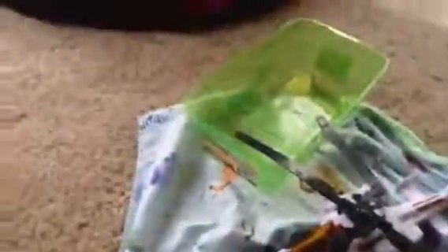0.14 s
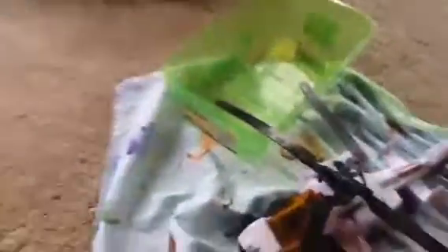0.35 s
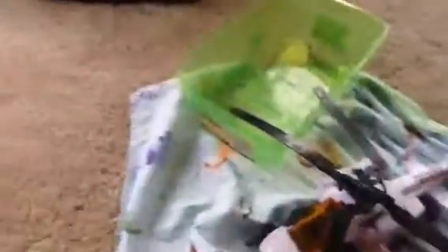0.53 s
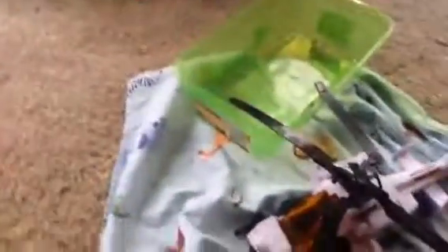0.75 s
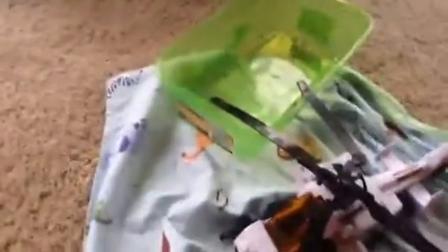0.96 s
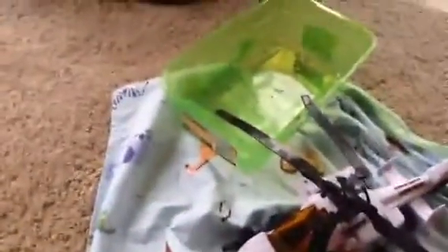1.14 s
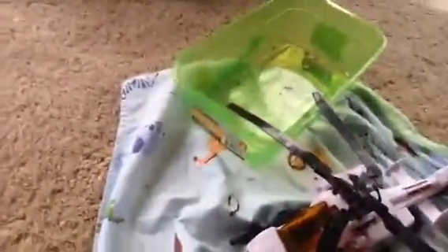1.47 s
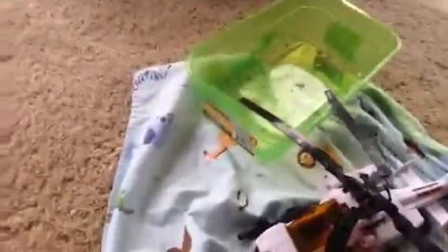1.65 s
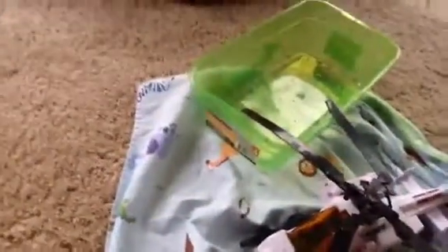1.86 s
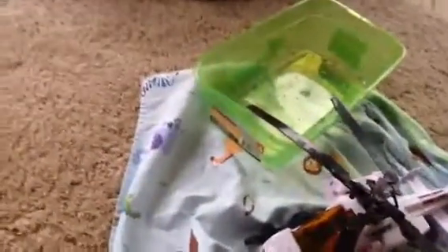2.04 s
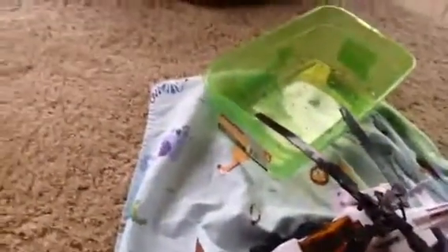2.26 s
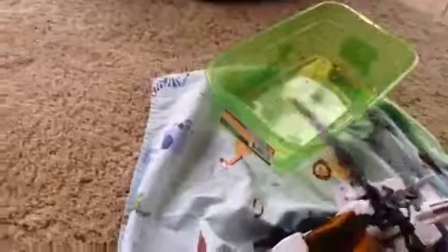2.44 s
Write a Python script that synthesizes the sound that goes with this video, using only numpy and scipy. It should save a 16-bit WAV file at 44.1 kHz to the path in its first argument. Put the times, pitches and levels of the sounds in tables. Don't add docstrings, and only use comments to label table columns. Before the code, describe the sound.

Close-up clatter of dried beans scooped and stirred by toy trucks in a plastic tub

```python
import sys
import numpy as np
from scipy import signal
from scipy.io import wavfile
from scipy.ndimage import uniform_filter1d

SR = 44100
rng = np.random.default_rng(int(sys.argv[2]) if len(sys.argv) > 2 else 0)


def field_ratio(decibels):
    return 10 ** (np.asarray(decibels, dtype=float) / 20)


def dump_mix(stems):
    frames = np.atleast_2d(stems).T
    limited = np.clip(frames, -1, 1)
    pcm = np.round(limited * 32767).astype(np.int16)
    wavfile.write(sys.argv[1], SR, pcm)


N = 114660

# start_s, peak_db, pitch_hz, rattle_ms
SCOOP_TICKS = [(0.3352, -29, 5000, 1), (0.4953, -33, 6500, 1.0), (0.6963, -28.5, 8400, 0.2),
               (0.8217, -22, 7800, 0.75), (0.8875, -19.5, 5100, 1), (0.901, -17.5, 8350, 2.7),
               (1.0302, -20, 5700, 0.66), (1.0665, -18, 4400, 6.7), (1.0855, -19, 4030, 6.4),
               (1.1106, -15, 4970, 0.37), (1.1563, -18.5, 7700, 0.76), (1.3781, -15.5, 5900, 0.14),
               (1.394, -21, 4140, 0.54), (1.4053, -24, 6100, 0.45), (1.4524, -19.5, 8800, 1.8),
               (1.4609, -23, 8500, 0.6), (1.5487, -19, 5040, 0.36), (1.6083, -21.5, 7100, 1.9),
               (1.6127, -17, 7350, 1.9), (1.6494, -8, 9300, 0.84), (1.6577, -14, 4940, 2.7),
               (1.7711, -9.5, 6190, 1.6)]
# start_s, peak_db, pitch_hz
POUR_TICKS = [(1.889, -19, 7800), (1.8946, -18.5, 8450), (1.9492, -19.5, 7200), (1.9614, -8, 4200),
              (2.0164, -23, 4310.0), (2.0688, -16, 6250), (2.0738, -16, 4400), (2.0786, -8, 4540),
              (2.0915, -10.5, 9200), (2.1037, -17, 8140), (2.1266, -17, 7800), (2.161, -15.5, 4870),
              (2.1874, -19.5, 5830), (2.2194, -8, 9050), (2.223, -15, 8900), (2.238, -10, 8550),
              (2.2606, -19, 6960), (2.2919, -13.5, 9900), (2.2975, -17, 6600), (2.4058, -16.5, 5500),
              (2.4413, -4, 8870), (2.4761, -19.5, 5200), (2.5435, -25.5, 9770.0)]
# start_s, peak_db, pitch_hz
BEAN_SKIPS = [(0.5433, -31, 7600), (.5656, -32, 5950), (.569, -25.5, 8100), (.5812, -27, 6860),
              (0.7071, -33, 3120), (0.7842, -31, 3280), (0.85, -26, 3440), (.988, -22.5, 6000),
              (1.242, -27, 5310), (1.259, -27, 8900), (1.2968, -22.5, 7900), (1.3279, -23, 4900),
              (1.3395, -24, 6120), (1.4316, -23, 6940), (1.539, -30.5, 3800), (1.6374, -26, 5260),
              (1.6936, -29, 4700), (1.716, -24.5, 4150), (2.0673, -14.5, 9100), (2.095, -12, 3500),
              (2.1002, -15, 4730), (2.117, -24, 7000), (2.1218, -21, 4000), (2.178, -16, 5000),
              (2.189, -17, 8860), (2.2178, -14.5, 6400), (2.2262, -22, 9170), (2.244, -17, 9310),
              (2.264, -11.5, 8100), (2.274, -21, 9380), (2.283, -17, 4000), (2.3267, -17, 6360),
              (2.3416, -26, 6880), (2.3638, -14.5, 6960), (2.4296, -24, 3800), (2.491, -26, 6400),
              (2.5235, -22.5, 6970), (2.5972, -24, 4960)]
# start_s, length_s, level_db
HANDFULS = [(0.486, 0.046, -43.5), (0.543, 0.066, -42.5), (0.7, 0.04, -53), (0.764, 0.18, -39),
            (0.904, 0.31, -41), (1.03, 0.16, -37), (1.149, 0.33, -41.5), (1.422, 0.2, -43),
            (1.505, 0.087, -39.5), (1.619, .13, -36), (1.877, 0.067, -41), (1.939, 0.075, -29.5),
            (2.007, 0.051, -38), (2.056, 0.1, -28), (2.167, 0.046, -30), (2.192, 0.14, -27),
            (2.326, 0.13, -26.5), (2.459, 0.08, -34), (2.517, 0.14, -45)]
# freq_hz, level_db
STIR_TONE = [(900, -17.5), (2500, -5.5), (5000, -2), (9500, -1.5), (13500, -4.5), (16500, -13)]
# time_s, level_db
SHOVE_LEVEL = [(.6, -53), (.7, -52.5), (.73, -48.5), (.88, -38), (1.1, -34), (1.2, -46.5), (1.3, -44),
               (1.72, -46), (1.87, -48.5), (1.95, -35.5), (2.05, -39), (2.09, -37.5), (2.37, -33),
               (2.45, -38), (2.6, -51)]
# freq_hz, level_db
SHOVE_TONE = [(60, -19.5), (350, 1.5), (800, 0), (1450, 1.5), (3500, 3), (7000, -2.5), (16000, -50)]
# start_s, peak_db, pitch_hz
TRUCK_KNOCKS = [(0.8221, -25, 1950), (0.9101, -14.5, 1610), (1.284, -28, 1550), (1.3771, -24, 2140),
                (1.3862, -19.5, 1520), (1.7716, -27, 1450), (1.8198, -37, 1560), (1.841, -32, 1410),
                (1.923, -20.5, 1260), (1.9624, -22, 2000), (2.0742, -20.5, 1170), (2.082, -16.5, 1970),
                (2.1335, -28, 1930.0), (2.1909, -17.5, 1465), (2.2359, -16.5, 1740), (2.3119, -23, 1480),
                (2.352, -15, 1620)]
# start_s, peak_db, pitch_hz
PART_CHATTER = [(0.708, -41, 1970), (0.726, -36, 1050), (0.784, -31.5, 1080), (0.85, -29, 2230),
                (0.901, -17, 1620), (1.217, -36, 1330), (1.241, -33.5, 2030), (1.291, -26, 1550),
                (1.307, -34, 1580), (1.581, -32.5, 1970), (1.658, -30.5, 1840), (2.107, -25, 1370),
                (2.121, -25.5, 1600), (2.126, -25, 1500), (2.157, -41, 1470), (2.218, -18.5, 2160),
                (2.263, -25, 1610), (2.326, -31, 1570), (2.542, -29.5, 2140)]
# time_s, level_db
DRAG_LEVEL = [
    (0, -42),
    (.07, -40),
    (.135, -33),
    (.22, -36),
    (.3, -41),
    (.335, -37.5),
    (.4, -48.5),
    (.55, -55),
]
# freq_hz, level_db
DRAG_TONE = [(60, -51), (400, -12.5), (700, -14.5), (1030, -4), (2300, 1), (5000, -0.5), (13000, -11),
             (16000, -24)]
# pitch_hz, width_hz, level_db, loudest_s
AXLE_RINGS = [(655, 3.4, -3, 0.26), (900, 5.9, 3, 0.03), (1041, 34, 7, 0.026), (1080, 54, -7, 0.27),
              (1437, 8, 2.5, 0.26), (2280, 130, 0, .14), (5000, 340, 2, 0.28)]
# after_touch_s, level_db
BLOWS = [
    (.001, 0),
    (.006, -5),
    (0.0104, -2),
    (.021, 1),
    (.037, -10),
]
# pitch_hz, level_db, t60_s
TUB_RINGS = [(193, -13, 0.1), (300, -8, 0.44), (384, 10.5, 0.05), (452, 10, 0.056), (525, 10, 0.1),
             (624, 1, 0.14)]
# freq_hz, level_db
SLIDE_TONE = [(60, -65), (190, -9.5), (460, -7), (750, -6.5), (2300, -10.5), (12000, -24), (16000, -36)]
# start_s, peak_db, pitch_hz, t60_s
WALL_BOOMS = [(0.124, -32, 482, 0.04), (.2, -44, 396.3, 0.21), (0.461, -53, 218, 0.22),
              (0.496, -53, 195, 0.2), (0.541, -55, 206, .3), (1.0736, -14, 486, 0.03),
              (1.215, -36, 503, 0.035), (1.376, -30.5, 397, 0.027), (1.385, -33, 555, 0.027),
              (1.412, -40, 324, 0.041), (1.464, -39.5, 375, 0.031), (1.711, -41.5, 427, 0.047),
              (1.77, -38, 480, 0.036), (2.345, -33.5, 503, 0.038), (1.762, -35.5, 300, 0.024),
              (2.073, -25, 530, 0.02), (2.514, -45.5, 475, 0.1), (2.535, -46.5, 402, 0.27),
              (2.574, -45, 458, 0.45)]
# freq_hz, level_db
AIR_TONE = [(20, -1), (70, 6.5), (140, 4.5), (900, 8), (2500, -26.5), (9000, 0.5), (16000, -11)]


def evened(x):
    return x / np.sqrt(np.mean(x ** 2) + 1e-20)


def level(rows, off_db=-90):
    s, db = np.transpose(rows)
    after_db = off_db if s[-1] < 2 else db[-1]
    return field_ratio(np.interp(np.arange(N) / SR, s, db, left=off_db, right=after_db))


def colour(x, tone):
    f, db = np.transpose(tone)
    hz = abs(np.fft.fftfreq(4096, 1 / SR))
    curve_db = np.maximum(np.interp(np.log(hz + 1), np.log(f + 1), db), -100)
    log_gain = curve_db * np.log(10) / 20
    taps = np.fft.ifft(np.exp(np.conj(signal.hilbert(log_gain)))).real[:2048]
    return signal.oaconvolve(x, taps)[:len(x)]


def resonate(x, hz, width):
    r = np.exp(-np.pi * width / SR)
    return 2 * signal.lfilter([1 - r], [1, -r * np.exp(2j * np.pi * hz / SR)], x).real


def butter(x, order, hz, kind):
    return signal.sosfilt(signal.butter(order, hz, kind, fs=SR, output="sos"), x)


def add(mix, s, sound):
    part = mix[round(s * SR):][:len(sound)]
    part += sound[:len(part)]


def grains(per_s, spread_db, clump_db, clump_ms, hiss, low_hz, t60):
    size = field_ratio(spread_db * np.minimum(rng.exponential(1, N), 3))
    size = size * (rng.random(N) < per_s / SR)
    kind = rng.integers(0, 24, N)
    t = np.arange(300) / SR
    clicks = np.zeros(N)
    for k, hz in enumerate(np.geomspace(low_hz, 14000, num=24)):
        click = resonate(rng.standard_normal(300) * field_ratio(-60 * t / t60), hz, hz * 0.59)
        clicks += signal.oaconvolve(size * (kind == k), evened(click) * np.sqrt(hz))[:N]
    span = max(int(clump_ms * SR / 1000), 2)
    clump = evened(uniform_filter1d(uniform_filter1d(rng.standard_normal(N), span), span))
    return evened((evened(clicks) + hiss * rng.standard_normal(N)) * field_ratio(clump_db * clump))


def hits(rows, sharp, crack, tail_db):
    out = np.zeros(N)
    t = np.arange(1500) / SR
    for s, db, hz, ms in rows:
        snap = rng.standard_normal(1500) + 0.91 * (t == 0)
        fade = np.exp(-t * 1000 / max(ms, .15)) + field_ratio(tail_db) * np.exp(-t / 0.0018)
        burst = butter(snap * fade, 4, hz / 2.14, "high")
        burst = butter(burst, 2, 11500, "low")
        ring = resonate(resonate(burst, hz, hz / sharp), hz, 2 * hz / sharp)
        ring = butter(ring, 2, [hz / 1.44, hz * 1.376], "band")
        wide = resonate(resonate(burst, hz, hz * 10.0), hz, hz)
        hit = evened(ring) + crack * evened(wide)
        add(out, s, field_ratio(db) * hit / abs(hit).max())
    return out


def bean_ticks():
    rows = list(SCOOP_TICKS) + [(*row, .55) for row in POUR_TICKS]
    ticks = hits(rows, sharp=1.2, crack=0.95, tail_db=-14.0)
    skips = hits([(*row, .6) for row in BEAN_SKIPS], sharp=1.3, crack=1.3, tail_db=-34.5)
    return ticks + skips


def stir():
    effort = np.full(N, field_ratio(-56.0))
    for s, length, db in HANDFULS:
        u = np.linspace(0, 1, int(length * SR))
        add(effort, s, field_ratio(db) * np.interp(u, [0, 0.27, .7, 1], [0.014, 0.84, 0.47, 0.12]))
    beans = grains(per_s=1500, spread_db=3.5, clump_db=3.0, clump_ms=4.8, hiss=0.68, low_hz=2000, t60=0.0039)
    started = np.arange(N) > .45 * SR
    return evened(colour(beans, STIR_TONE)) * effort * started


def shove():
    heap = grains(per_s=1300, spread_db=3.5, clump_db=3.0, clump_ms=9.8, hiss=0.5, low_hz=880, t60=0.014)
    body = resonate(heap, 1450, 850)
    return evened(colour(heap + 0.69 * body, SHOVE_TONE)) * level(SHOVE_LEVEL)


def truck_knocks():
    knocks = hits([(*row, 1.5) for row in TRUCK_KNOCKS], sharp=3.9, crack=1.0, tail_db=-31)
    chatter = hits([(*row, 1.6) for row in PART_CHATTER], sharp=3.8, crack=1.04, tail_db=-15)
    return knocks + chatter


def drag():
    rub = grains(per_s=5500, spread_db=4.0, clump_db=0.93, clump_ms=9.4, hiss=1.75, low_hz=830, t60=0.0037)
    rub = rub * level(DRAG_LEVEL)
    t = np.arange(N) / SR
    ring = np.zeros(N)
    for hz, width, db, s in AXLE_RINGS:
        push = rub * np.exp(-((t - s) / 0.13) ** 2)
        ring += field_ratio(db) * resonate(push, hz, width) * np.sqrt(1000 / width)
    body = colour(rub, DRAG_TONE)
    return body * np.std(rub) / np.std(body) + field_ratio(-4.5) * ring


def thud():
    t = np.arange(SR // 2) / SR
    blows = sum(field_ratio(db) * (t >= s) * np.exp(-abs(t - s) / 0.00036) for s, db in BLOWS)
    blows = blows * (1 + 0.38 * rng.standard_normal(len(t)))
    ring = np.zeros(len(t))
    for hz, db, t60 in TUB_RINGS:
        mode = field_ratio(db - 60 * t / t60) * np.sin(2 * np.pi * hz * t)
        ring += signal.oaconvolve(blows, mode)[:len(t)]
    flutter = evened(uniform_filter1d(rng.standard_normal(len(t)), 60))
    slide = evened(colour(rng.standard_normal(len(t)) * field_ratio(2.0 * flutter), SLIDE_TONE))
    slide = slide * field_ratio(-60 * t / 0.57) * np.minimum(t / 0.0014, 1)
    out = np.zeros(N)
    add(out, .9025, field_ratio(-22) * (slide + field_ratio(9.5) * ring / abs(ring).max()))
    return butter(out, 4, 160, "high")


def wall_booms():
    out = np.zeros(N)
    t = np.arange(SR // 2) / SR
    for s, db, hz, t60 in WALL_BOOMS:
        onset = np.minimum(t / 0.0033, 1)
        add(out, s, field_ratio(db - 60 * t / t60) * onset * np.sin(2 * np.pi * hz * t))
    return out


def room(x):
    taps = np.zeros(SR // 2)
    at = np.arange(150, SR // 2 - 20, 20)
    taps[at + rng.integers(0, 20, len(at))] = rng.choice([-1., 1.], len(at))
    taps = colour(taps, [(300, -8.0), (1500, 0.5), (12000, -6.5)])
    taps = taps * field_ratio(-60 * np.arange(len(taps)) / SR / 0.12)
    return signal.oaconvolve(x, taps / np.linalg.norm(taps))[:N]


def room_air():
    return field_ratio(-56) * evened(colour(rng.standard_normal(N), AIR_TONE))


def scene():
    near = bean_ticks() + stir() + shove() + truck_knocks() + drag() + thud() + wall_booms()
    return (near + field_ratio(-16) * room(near) + room_air())[None]


def band_limit(x):
    return signal.sosfilt(signal.butter(12, 16500, fs=SR, output="sos"), x)


def record(dry):
    x = butter(dry, 3, 130, "high")
    wall = signal.firwin(255, 15300, window=("kaiser", 3), fs=SR)
    low = signal.oaconvolve(x, wall[None], "same")
    mix = low + field_ratio(-42) * (x - low)
    return band_limit(mix)


dry = scene()
out = record(dry)
dump_mix(out)
```